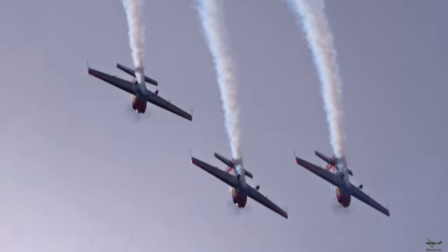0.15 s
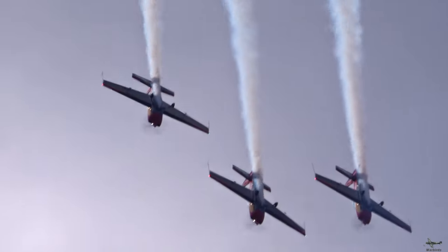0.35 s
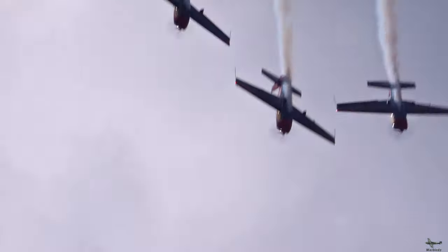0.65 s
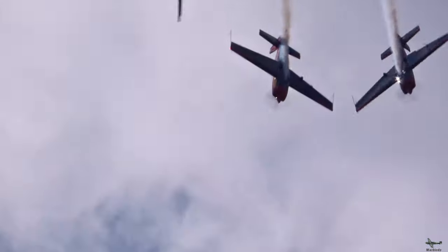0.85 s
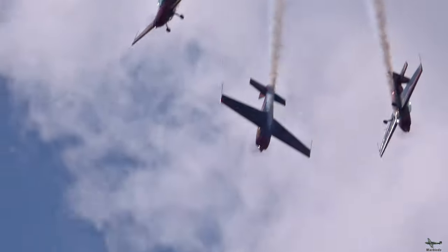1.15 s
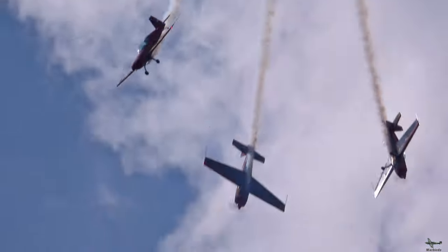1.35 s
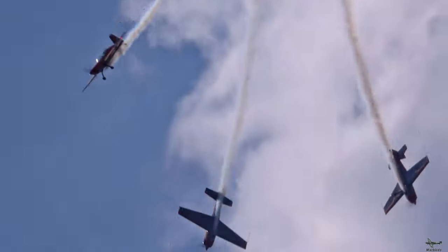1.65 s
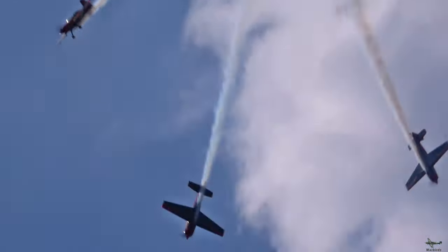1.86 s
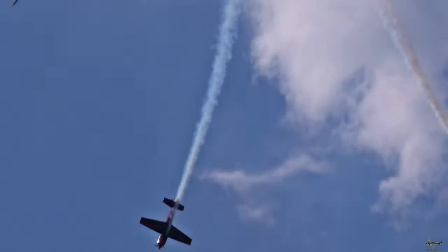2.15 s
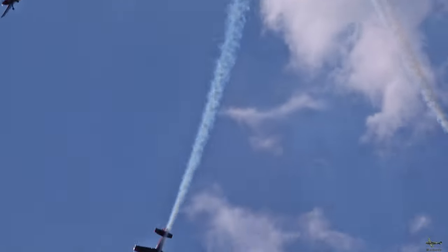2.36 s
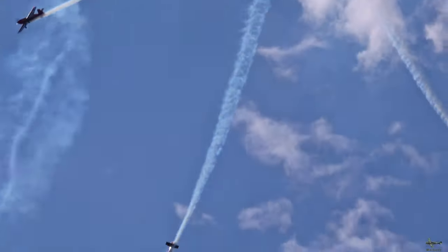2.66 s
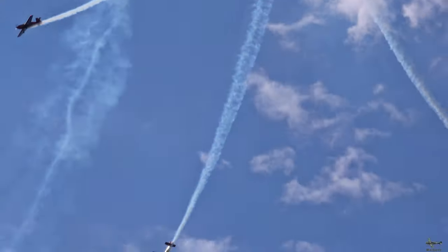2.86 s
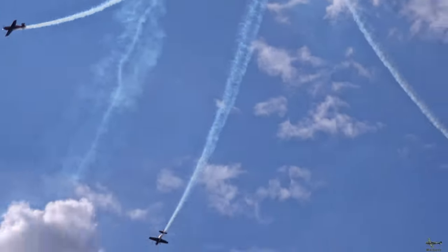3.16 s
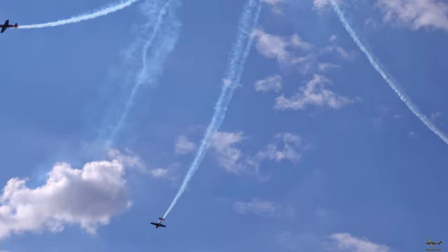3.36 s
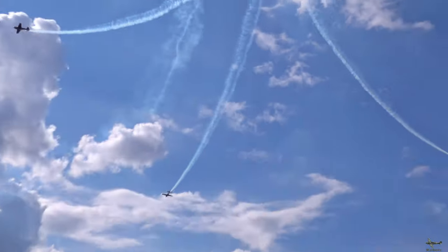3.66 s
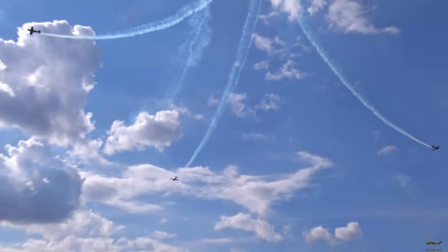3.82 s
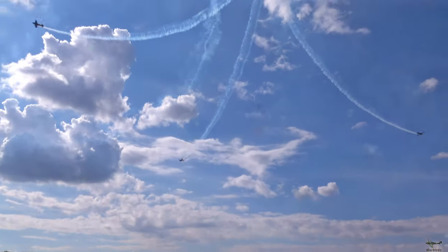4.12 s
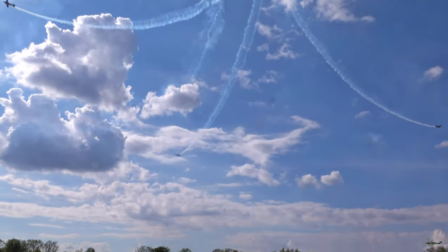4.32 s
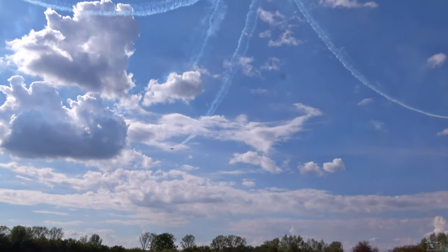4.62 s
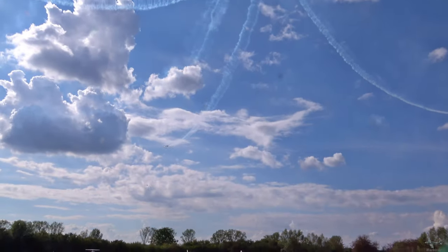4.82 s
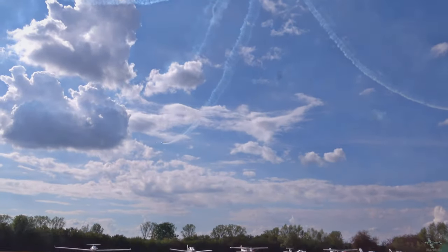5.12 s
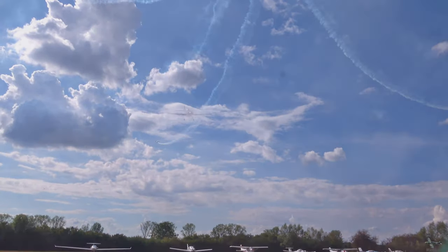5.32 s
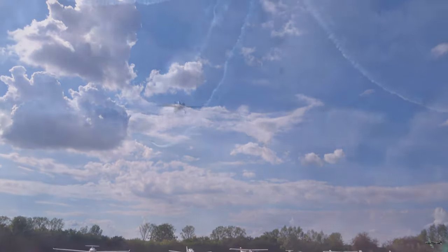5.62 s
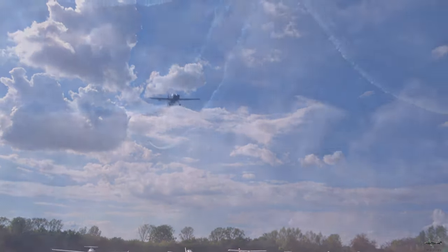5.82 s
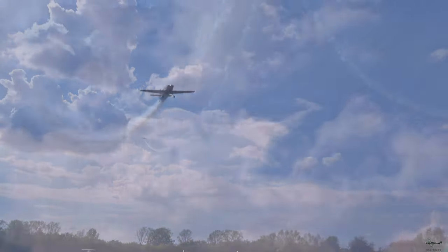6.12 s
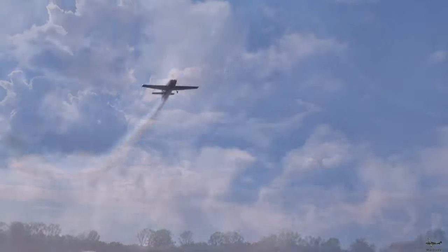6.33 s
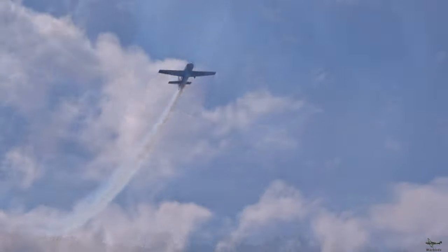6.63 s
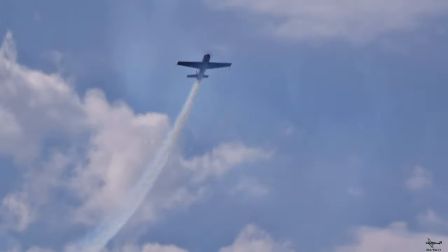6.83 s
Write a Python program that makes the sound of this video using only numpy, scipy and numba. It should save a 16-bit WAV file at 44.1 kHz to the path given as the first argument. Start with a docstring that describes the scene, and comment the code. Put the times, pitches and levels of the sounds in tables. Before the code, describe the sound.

Buzzing piston aircraft dive overhead at an airfield, their layered engine notes peaking loudly, sagging lower, then thinning into airy whistle and distant drone.

```python
"""Aerobatic planes over an airfield

Aerobatic planes dive and sweep past high overhead, heard by a camera on the grass.
Each six-cylinder engine fires three times a turn and swings a four-blade propeller: both are stacks of overtones.
The pitch falls as a plane passes. Filtered noise makes the airflow roar and whistle; short tones add pips.
Gusty air makes it flicker. A faint hum stays underneath, loud peaks clip, and small steps tick a few times."""
import sys
import numpy as np
from scipy import signal
from scipy.fft import rfft, irfft
from scipy.io import wavfile
from scipy.ndimage import uniform_filter1d
from numba import njit

SR = 44100
rng = np.random.default_rng(int(sys.argv[2]) if len(sys.argv) > 2 else 0)


def wrap_up_sound(samples):
    """Save the sound to the file named by the first command line argument, as 16-bit audio."""
    columns = np.atleast_2d(samples).T
    # keep every value between -1 and 1, then stretch to whole-number steps
    tamed = np.clip(columns, -1, 1)
    steps = np.round(tamed * 32767).astype(np.int16)
    wavfile.write(sys.argv[1], SR, steps)


N = 307818
T = np.arange(N) / SR  # time of every sample [s]


def undb(db):
    """Turn decibels into a plain multiplier."""
    return 10 ** (np.asarray(db) / 20)


def unit(x):
    """Scale a sound to an average (RMS) strength of 1."""
    return x / np.sqrt(np.mean(x ** 2))


def columns(table):
    """Draw each column as a line over time, with a gate that fades over 0.1 s where the table starts or ends."""
    times, *values = np.transpose(table)
    # no fade at the very start or end of the scene
    since_start = T - times[0] + (times[0] < .05)
    until_end = times[-1] - T + (times[-1] > T[-1] - .05)
    gate = np.clip(np.minimum(since_start, until_end) / .1, 0, 1)
    return gate, [np.interp(T, times, column) for column in values]


def walk(rate):
    """Smooth random wander, about rate turns a second, spread about 1."""
    hold = max(int(SR / rate), 2)
    stairs = np.repeat(rng.standard_normal(N // hold + 1), hold)
    smooth = uniform_filter1d(uniform_filter1d(stairs, hold), hold)
    return 1.42 * smooth[:N]


def coloured(spectrum, swell_db, flicker_db):
    """Noise in half-octave bands: gusts swell them together, and each also flickers alone."""
    hz, db = np.transpose(spectrum)
    f = np.maximum(np.fft.rfftfreq(N, 1 / SR), 1)
    shape_db = np.interp(np.log(f), np.log(hz), db, -90, -90)
    noise = rfft(rng.standard_normal(N)) * undb(shape_db)
    swell = swell_db * walk(16)
    out = 0
    for octave in np.arange(np.floor(np.log2(hz[0])), np.log2(hz[-1]) + .5, .5):
        share = np.clip(1 - 2 * abs(np.log2(f) - octave), 0, 1)  # neighbouring bands cross-fade
        band = irfft(noise * share, N)
        out = out + undb(swell + flicker_db * walk(9)) * band
    return unit(out)


def hum():
    """A faint drone: one sine of steady pitch whose level wanders slowly."""
    HUM_HZ, HUM_DB = 116, -41.5
    return undb(HUM_DB + 2.5 * walk(1.7)) * np.sin(2 * np.pi * HUM_HZ * T)


# Airflow roar between its swells: (time [s], body level [dB], rush level [dB], hiss level [dB])
CALM_ROAR = [(0.0, -40, -47, -55), (0.5, -41.5, -44.5, -57), (0.8, -33.5, -40.5, -53.5),
             (1.48, -33.5, -45, -51.5), (1.7, -34, -38, -46), (1.82, -32.5, -35, -41.5),
             (2.36, -29, -36.5, -45.5), (2.76, -25, -32.5, -37.5), (3.1, -25.5, -29.5, -38.5),
             (3.5, -25, -33, -37.5), (4.0, -26.5, -34.5, -40.5), (4.45, -29.5, -36.5, -38.5),
             (4.68, -31, -42, -42), (4.95, -30.5, -35, -44.5), (5.2, -34, -44.5, -50),
             (5.75, -35, -47.5, -56), (6.1, -39.5, -46, -57), (6.72, -42, -46, -57.5),
             (6.85, -40, -40.5, -53.5), (6.98, -33, -31.5, -40.5)]
# Brief changes as gusts carry the roar:
# (time of peak [s], length [s], body change [dB], rush change [dB], hiss change [dB])
GUST_SWELLS = [(1.03, 0.14, 3, -2.5, 0.5), (1.19, .2, 0, 6.5, 1), (2.06, 0.28, 9.5, 4.5, 2.5),
               (2.6, 0.19, 6.5, 3.5, 1), (2.92, 0.15, 3.5, 2.5, 0.5), (3.35, 0.12, 8.5, 4.5, 1.5),
               (3.56, .08, 3, 4, 0), (3.79, 0.15, 5, 7.5, 10), (4.141, 0.26, 5.5, 4.5, 3.5),
               (4.78, .1, 6.5, 7.5, 4), (4.92, .12, -0.5, -0.5, 4.5), (5.09, 0.089, 6, 3.5, 4.5),
               (5.32, .12, 3, 6.5, 8.5), (5.616, .1, 0.5, 6.5, 4.5), (5.87, 0.26, 4.5, 8.5, 8),
               (6.48, .1, 6.5, 2, -2)]
# Tone colour of the four layers, lowest to highest: (frequency [Hz], level per Hz [dB])
RUMBLE_COLOUR = [(22, -12.5), (45, -10), (90, -1.5), (160, -0.5), (300, -2), (450, -2), (650, -27.5)]
BODY_COLOUR = [(70, -21), (120, -14.5), (200, 4.5), (400, -1), (800, -3), (1200, -8.5), (1800, -37.5)]
RUSH_COLOUR = [(800, -14.5), (1200, -2), (1700, -1.5), (2300, -6.5), (3000, -24)]
HISS_COLOUR = [(1700, -20), (2400, -0.5), (2900, 0), (3300, -5), (4100, -7.5), (4700, -14), (5400, -24),
               (7000, -39), (9000, -62.5)]


def roar(beat):
    """Broad airflow noise over a far rumble that swells less; the upper layers throb a little with the blades."""
    _, calm_db = columns(CALM_ROAR)
    level_db = np.array(calm_db)
    for peak_s, length_s, *change_db in GUST_SWELLS:
        bump = np.exp(-(2 * (T - peak_s) / length_s) ** 2)
        level_db = level_db + np.outer(change_db, bump)
    body_db, rush_db, hiss_db = level_db
    rumble_db = -36 + 0.14 * (body_db + 32)  # follows the body only weakly
    rumble = undb(rumble_db) * coloured(RUMBLE_COLOUR, swell_db=0.5, flicker_db=3.0)
    body = undb(body_db) * coloured(BODY_COLOUR, swell_db=1.25, flicker_db=1.83)
    rush = undb(rush_db) * coloured(RUSH_COLOUR, swell_db=0.97, flicker_db=-0.4)
    hiss = undb(hiss_db) * coloured(HISS_COLOUR, swell_db=1.96, flicker_db=1.0)
    throb = 1 + 0.23 * np.tanh(8 * beat)
    return rumble + body + (rush + hiss) * throb


# Sudden small steps in the sound: (time [s], step size [dB])
TICK_STEPS = [(4.9267, -37.5), (5.0604, -12.5), (5.528, -11), (5.628, -26.5), (6.0275, -25.5),
              (6.5955, -19)]


def ticks():
    """Sudden downward steps that recover within milliseconds."""
    RECOVERY_S = 0.00094
    steps = np.zeros(N)
    for s, db in TICK_STEPS:
        steps[int(s * SR)] = -undb(db)
    return signal.lfilter([1], [1, -np.exp(-1 / (RECOVERY_S * SR))], steps)


@njit
def svf(x, hz, width):
    """State-variable band-pass: keeps a band width Hz wide around a moving centre."""
    y, band, low = np.empty(len(x)), 0., 0.
    for i in range(len(x)):
        g, k = np.tan(np.pi * hz[i] / SR), width / hz[i]
        v = (band + g * (x[i] - low)) / (1 + g * (g + k))
        band, low, y[i] = 2 * v - band, low + 2 * g * v, k * v
    return y


# Breathy whistle of air over a plane, high while near and lower later, one table per stretch:
# (time [s], centre frequency [Hz], level [dB])
WHISTLE_STRETCHES = [
    [(2.3, 3914, -58), (2.6, 3989, -48), (2.85, 4088, -56)],
    [(4.65, 2657, -48), (4.76, 2680, -42.5), (4.9, 2700, -41.5), (5.2, 2390, -48.5), (5.35, 2342, -44.5),
     (5.5, 2330, -49.5), (5.87, 2347, -46), (6.15, 2178, -56)],
]
# Brief clear pips in the whistle: (time of peak [s], pitch at peak [Hz], peak level [dB])
WHISTLE_PIPS = [(2.36, 3975, -45), (2.38, 3950, -42), (2.59, 3943, -35), (2.613, 3950, -37),
                (2.668, 4070, -34), (4.92, 2690, -33.5), (5.305, 2240, -34), (5.338, 2360, -30),
                (5.395, 2230, -35), (5.572, 2298, -38), (5.593, 2237, -39), (5.68, 2320, -37),
                (5.86, 2316, -26.5), (5.887, 2291, -27), (5.996, 2260, -33)]


def whistle():
    """Air whistling over a plane: narrow flickering noise, with short pips that droop in pitch."""
    WIDTH_HZ, PIP_S = 380., 0.015
    out = 0
    for table in WHISTLE_STRETCHES:
        gate, (hz, db) = columns(table)
        air = svf(rng.standard_normal(N), hz, WIDTH_HZ)
        air = svf(air, hz, WIDTH_HZ)
        out = out + gate * undb(db + 3.0 * walk(40)) * unit(air)
    for s, hz, db in WHISTLE_PIPS:
        t = T - s
        envelope = np.exp(-(2 * t / PIP_S) ** 2)
        out = out + undb(db) * envelope * np.sin(2 * np.pi * hz * t * (1 - 1.2 * t))
    return out


def order_of(multiple):
    """A four-stroke engine repeats every two turns: only half multiples of the shaft rate exist."""
    return round(2 * multiple) / 2


def stack(turn, multiple, levels_db, fall_db, count):
    """A pulse train as overtones: the lowest as given, the rest falling on; gusts shake the high ones more."""
    out = 0
    for k in range(1, count + 1):
        beyond = max(k - len(levels_db), 0)  # steps past the last given level
        level = levels_db[k - 1 - beyond] + fall_db * beyond ** 1.1
        shake = .11 * k * walk(24)
        flicker_db = 0.92 * k ** 0.88 * walk(11)
        out = out - undb(level + flicker_db) * np.cos(k * multiple * turn + shake)
    return np.sqrt(2) * out


# Uneven exhaust pipes sound between the firing tones:
# (multiple of shaft rate, level against the mean dB of firing tone and octave [dB])
UNEVEN_PIPES = [(2, -25.5), (2.5, -26.5), (3.5, -30), (4.5, -8.5), (5, -14), (5.5, -22), (7, -12),
                (10, -9.5)]


def plane(table, octave_db):
    """Exhaust and propeller of one plane, and the beat that its blades give the airflow."""
    # once a plane has passed and its pitch sinks, the firing tone's octave gains
    PASSED_HZ, OCTAVE_DB_PER_HZ = 44.5, 1.16
    gate, (shaft_hz, fire, blade, fall) = columns(table)
    octave_gain_db = OCTAVE_DB_PER_HZ * np.maximum(PASSED_HZ - shaft_hz, 0)
    fire_db = [fire, fire + octave_db + octave_gain_db]
    blade_db = [blade, blade + fall, blade + 2.4 * fall]
    turn = 2 * np.pi * (np.cumsum(shaft_hz) / SR + rng.random())  # shaft angle [rad]
    exhaust = stack(turn, order_of(3), fire_db, fall_db=-24, count=3)
    blades = stack(turn, order_of(4), blade_db, fall_db=-4.0 + .45 * fall, count=7)
    # the blade tone fades with distance, and the high multiples with it
    near_db = np.minimum(blade_db[0] + 26.5, 0)
    for multiple, share_db in UNEVEN_PIPES:
        far_db = .012 * multiple * multiple * near_db
        level = np.mean(fire_db, axis=0) + share_db + far_db + 4.2 * walk(7.6)
        exhaust += undb(level) * np.cos(order_of(multiple) * turn + 2 * np.pi * rng.random())
    # the beat has the blade tone's pitch and the level of its first overtone
    beat = gate * undb(blade_db[1]) * np.cos(order_of(4) * turn)
    return gate * (exhaust + blades), beat


# One table per plane, shaft rate as heard: (time [s], shaft rate [Hz], firing tone level [dB],
# blade tone level [dB], step from blade tone to its first overtone [dB])
FIRST_PLANE = [(0.0, 49.36, -25.5, -47, -17), (0.15, 49, -42, -39, -5), (0.32, 48.1, -24.5, -49, -7),
               (0.501, 45.6, -31, -46, -8), (0.7, 50.19, -20.5, -33, -9), (0.85, 52.94, -23, -31.5, -10),
               (1.07, 55.2, -19, -31, -10), (1.248, 51.55, -18, -32, -17), (1.42, 50.66, -24, -28, -20),
               (1.65, 51.3, -27.5, -28.5, -13), (1.899, 53.94, -21, -18.5, -13),
               (2.048, 53.76, -24.5, -16, -12), (2.199, 52.27, -15, -33, -8),
               (2.401, 50.9, -25.5, -26.5, -7), (2.6, 51.69, -29, -23, -3), (2.85, 49.84, -27.5, -23, -4),
               (3.05, 48.6, -22.5, -17.5, -3), (3.301, 46.28, -23.5, -15.5, -6),
               (3.55, 44.3, -27.5, -10, -5.5), (3.85, 41.85, -38.5, -12.5, -10.5),
               (4.3, 38.7, -34.5, -18.5, -17), (4.8, 36.74, -35.5, -26, -9.5), (5.3, 35.53, -44.5, -35, 0)]
SECOND_PLANE = [(0.0, 50.58, -55, -32, -18.5), (0.2, 49.8, -26, -42, -12), (0.6, 51.0, -22, -43.5, -6.5),
                (0.999, 51.3, -21.5, -38, -5.5), (1.15, 51.62, -23, -36.5, -8),
                (1.5, 51.98, -20, -32, -11.5), (1.8, 52.19, -26.5, -24, -19),
                (2.001, 53.36, -21, -16.5, -11), (2.3, 51.87, -22, -30.5, -13.5),
                (2.552, 52.52, -26.5, -27.5, -13), (2.8, 53.02, -25, -26, -3), (3.1, 52.8, -27.5, -31, -3),
                (3.4, 52.8, -24, -29.5, -5), (3.701, 50.6, -23, -21.5, -2), (3.95, 50.34, -21, -16.5, -6.5),
                (4.1, 48.35, -26.5, -16.5, -4.5), (4.249, 47.24, -23.5, -10.5, -7.5),
                (4.5, 44.84, -26, -11.5, -7), (4.75, 42.42, -27, -12.5, -6.5),
                (5.2, 39.07, -33, -19, -13.5), (5.65, 37, -33.5, -23, -15.5),
                (6.15, 35.9, -45.5, -39.5, -4)]
THIRD_PLANE = [(2.499, 51.1, -15.5, -35, -1), (2.75, 51.62, -22, -19, -5.5), (2.95, 50.11, -27, -21, -2),
               (3.149, 49.3, -21.5, -17, -2.5), (3.35, 47.48, -20.5, -17, -3),
               (3.5, 46.78, -26.5, -17, -9.5), (3.651, 45, -28, -25, -1.5), (3.85, 43.75, -28, -20.5, -10),
               (4.4, 39.34, -34.5, -29, -13)]
CLIMBING_PLANE = [(5.9, 58.35, -46, -34, -12), (6.1, 57.6, -38.5, -40.5, -7),
                  (6.499, 58.44, -32.5, -28.5, -9), (6.749, 60.74, -28.5, -35, -11),
                  (6.98, 61.74, -27, -29, -9)]
DISTANT_PLANE = [(5.7, 39.5, -39, -37, -17), (6.0, 38.97, -47, -36.5, -13), (6.3, 39.36, -45, -30, -13.5),
                 (6.98, 39.22, -36, -31.5, -7)]
# Octave of the firing tone before it gains, one value per plane: (level against the firing tone [dB])
PLANE_OCTAVES = (-3.5, -5, -2.5, -1.5, -3)


def planes():
    """All planes added together, each with its own engine and propeller, and their summed blade beat."""
    tables = (FIRST_PLANE, SECOND_PLANE, THIRD_PLANE, CLIMBING_PLANE, DISTANT_PLANE)
    return sum(np.array(plane(table, octave_db)) for table, octave_db in zip(tables, PLANE_OCTAVES))


def scene():
    """Add the planes to the air around them, the hum and the ticks."""
    engines, beat = planes()
    return (hum() + roar(beat) + ticks() + whistle() + engines)[None]


def record(dry):
    """The camera clips the loudest peaks, adds its hiss and cuts the top."""
    FLOOR_DB, TOP_HZ = -79, 15800
    wet = np.clip(dry, -1, 1) + undb(FLOOR_DB) * rng.standard_normal(dry.shape)
    top_cut = signal.ellip(8, .1, 40, TOP_HZ, fs=SR, output="sos")
    return np.clip(signal.sosfiltfilt(top_cut, wet), -1, 1)


dry = scene()
out = record(dry)
wrap_up_sound(out)
```